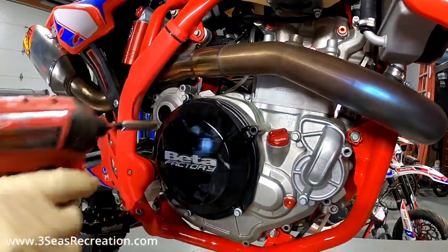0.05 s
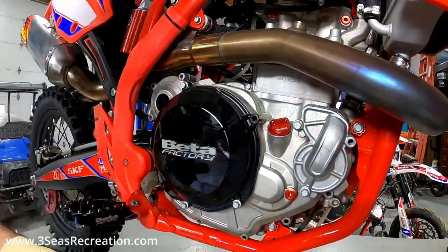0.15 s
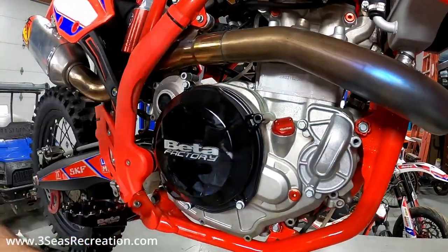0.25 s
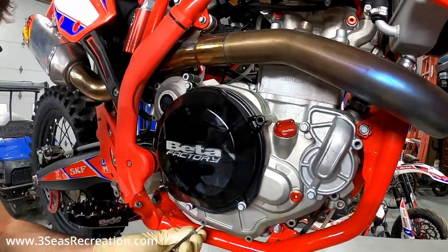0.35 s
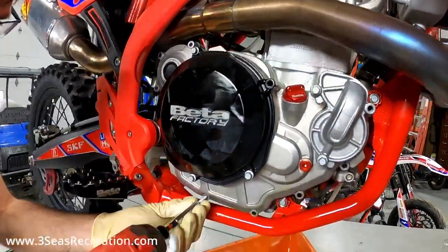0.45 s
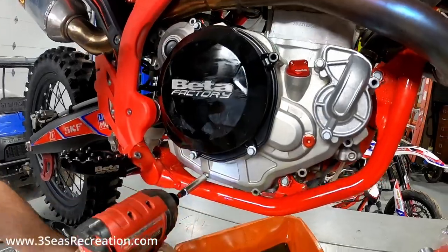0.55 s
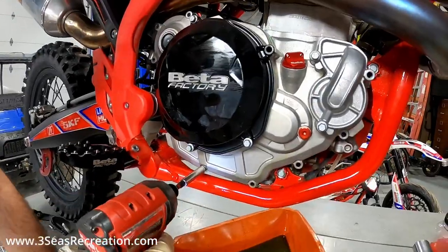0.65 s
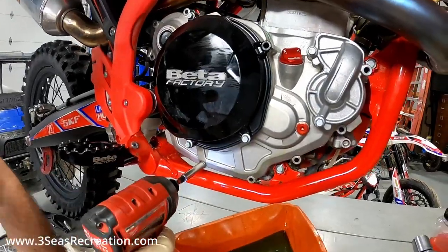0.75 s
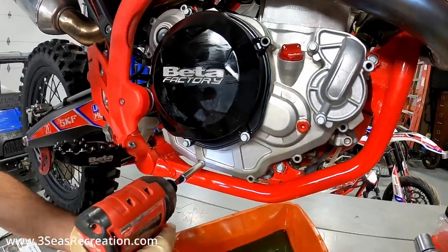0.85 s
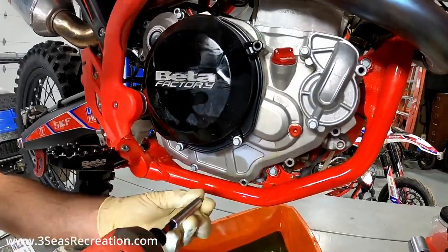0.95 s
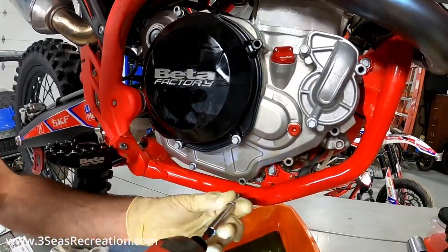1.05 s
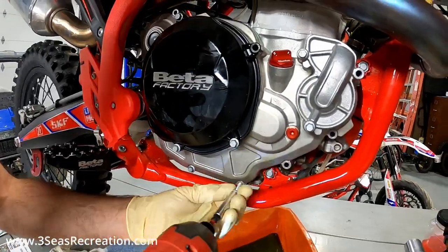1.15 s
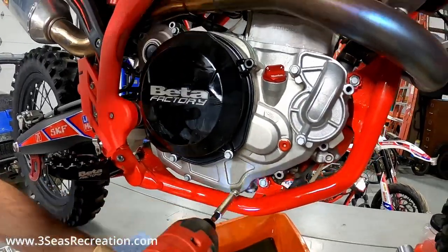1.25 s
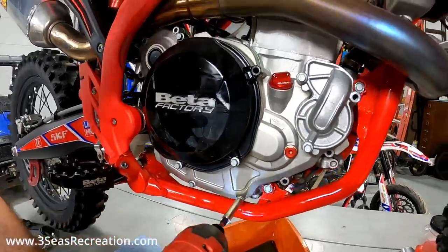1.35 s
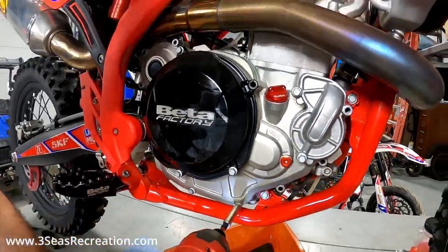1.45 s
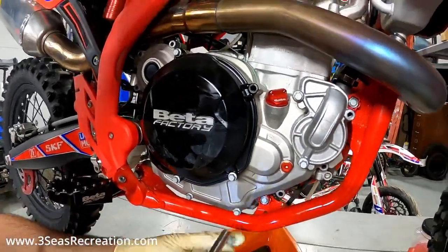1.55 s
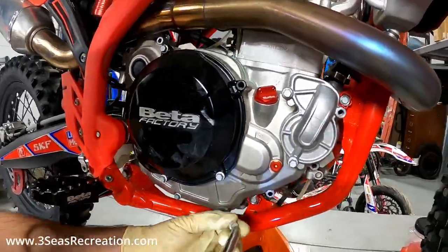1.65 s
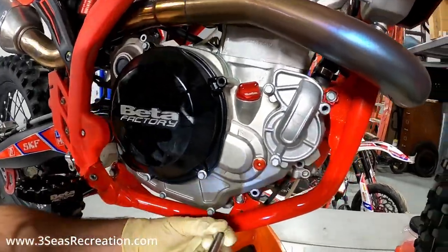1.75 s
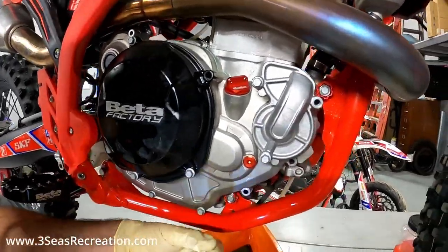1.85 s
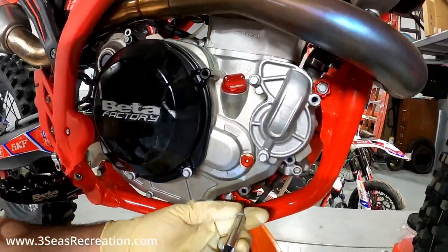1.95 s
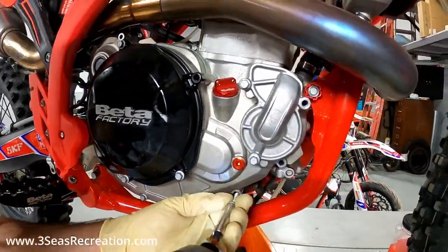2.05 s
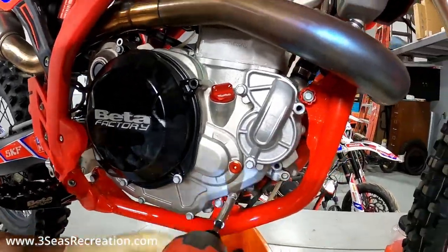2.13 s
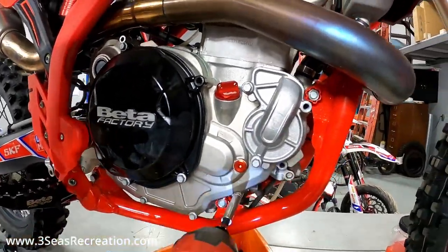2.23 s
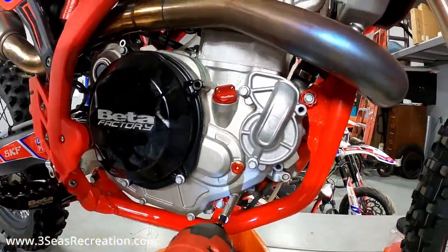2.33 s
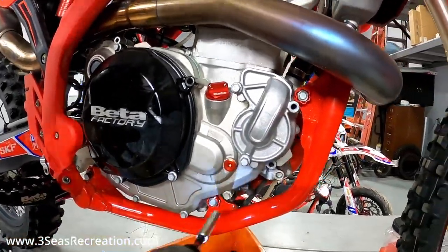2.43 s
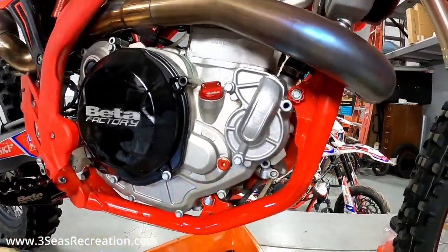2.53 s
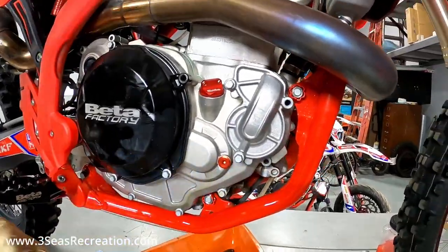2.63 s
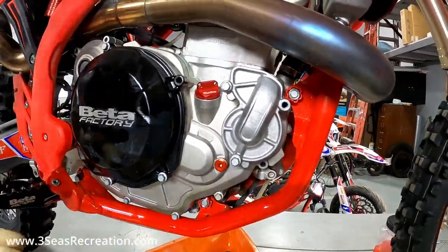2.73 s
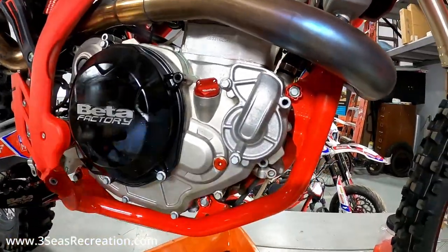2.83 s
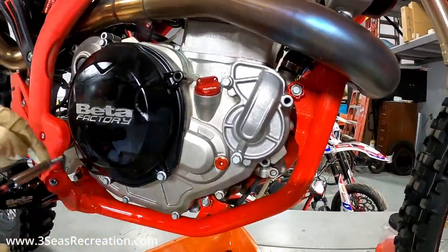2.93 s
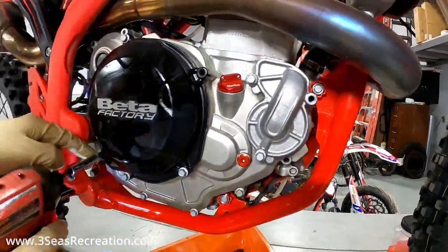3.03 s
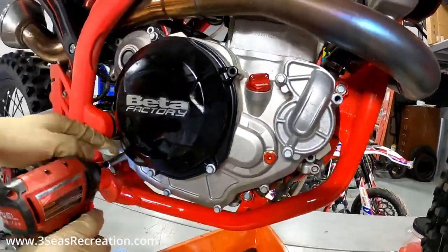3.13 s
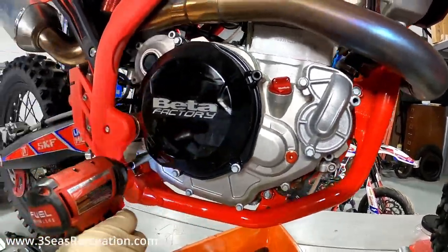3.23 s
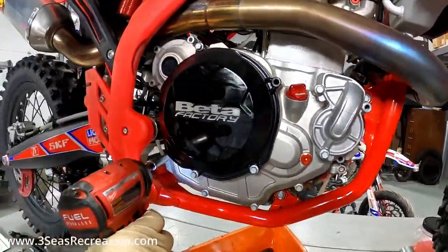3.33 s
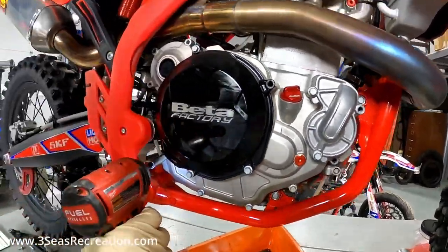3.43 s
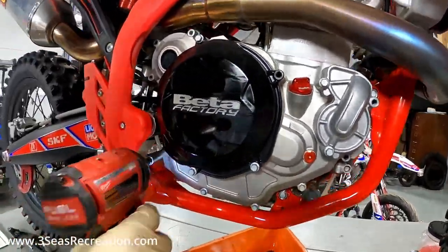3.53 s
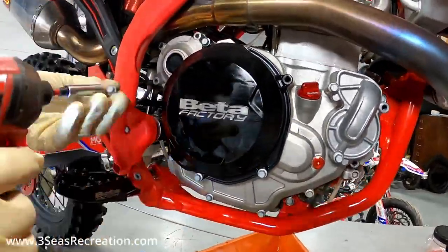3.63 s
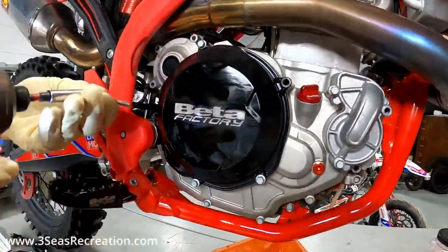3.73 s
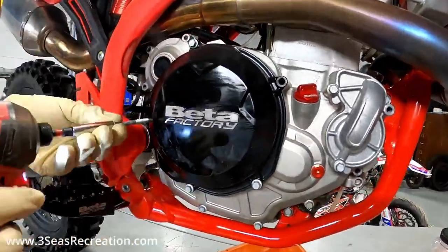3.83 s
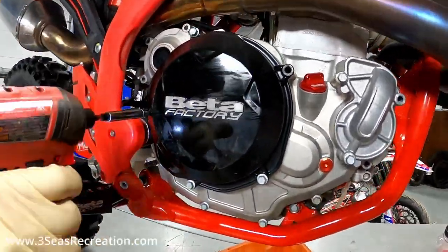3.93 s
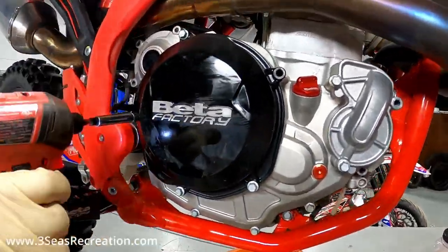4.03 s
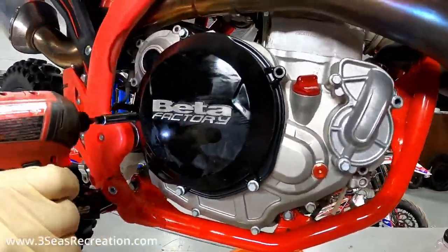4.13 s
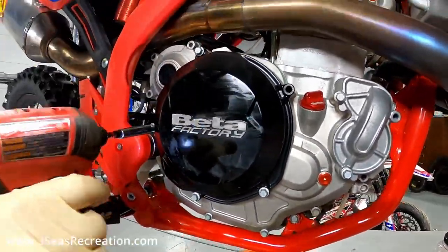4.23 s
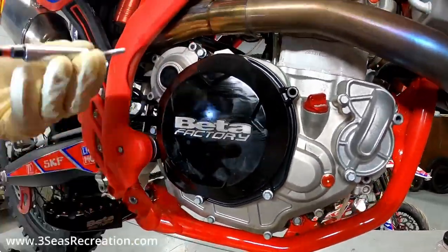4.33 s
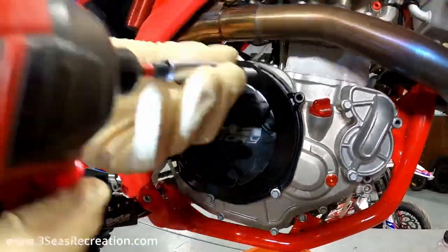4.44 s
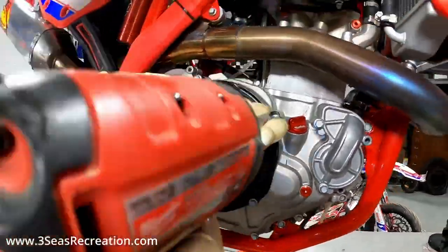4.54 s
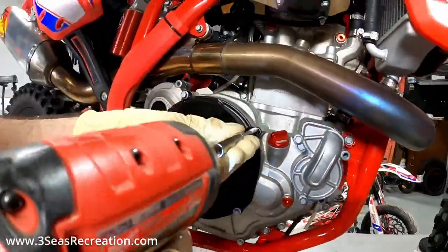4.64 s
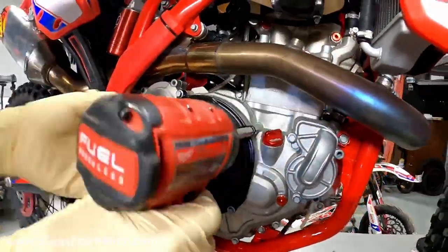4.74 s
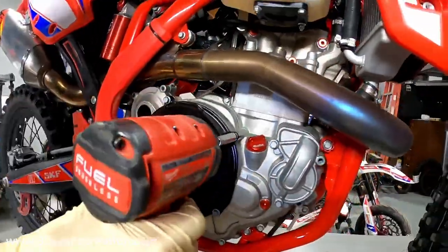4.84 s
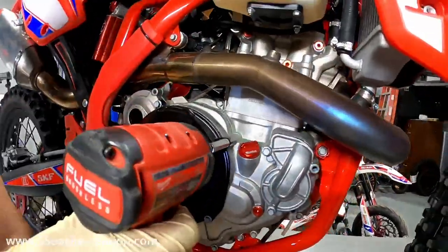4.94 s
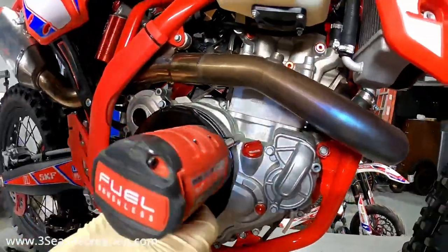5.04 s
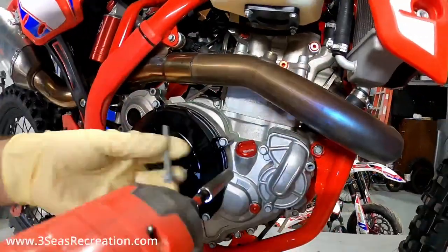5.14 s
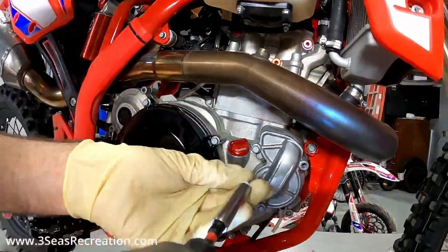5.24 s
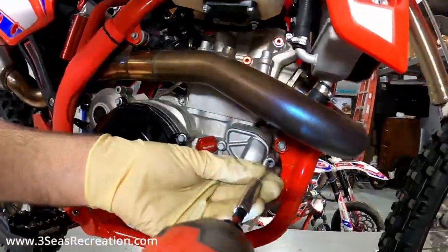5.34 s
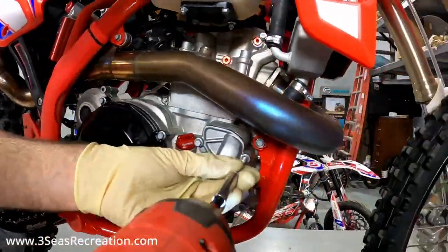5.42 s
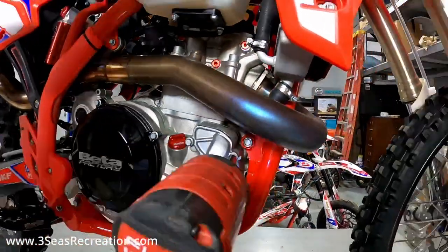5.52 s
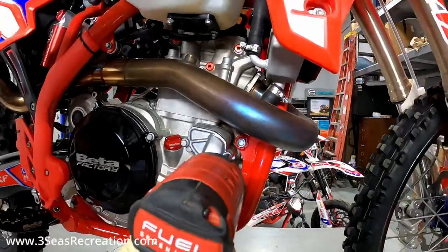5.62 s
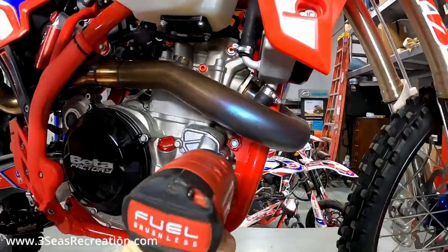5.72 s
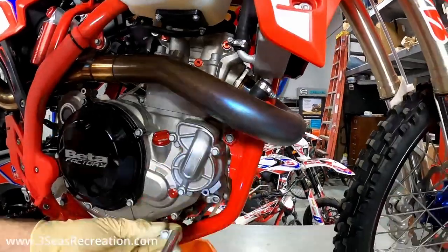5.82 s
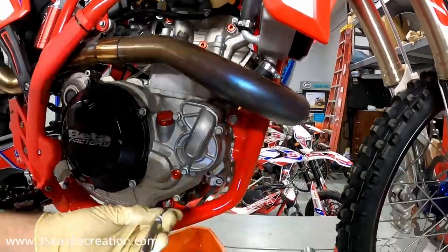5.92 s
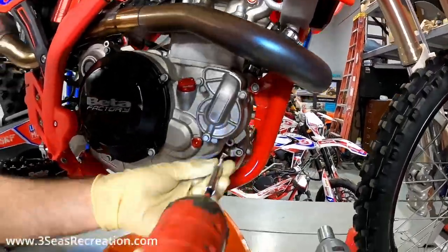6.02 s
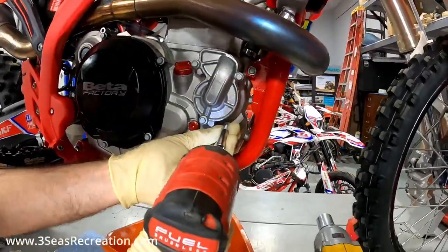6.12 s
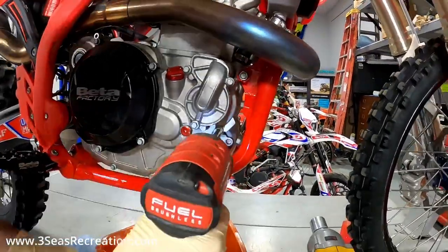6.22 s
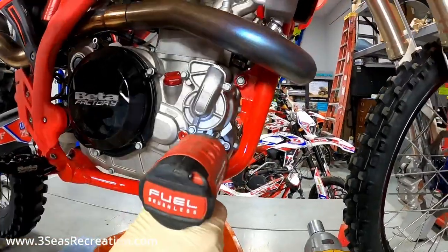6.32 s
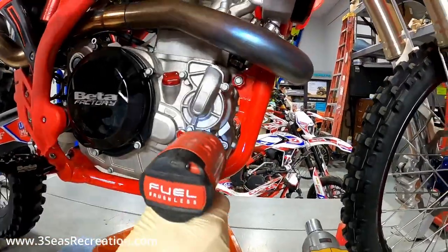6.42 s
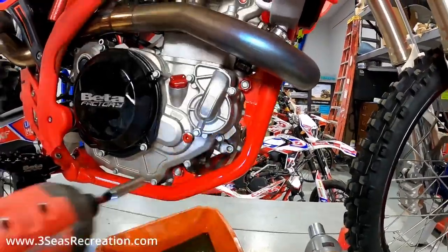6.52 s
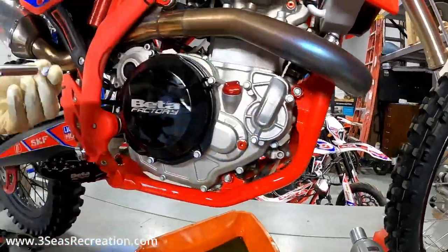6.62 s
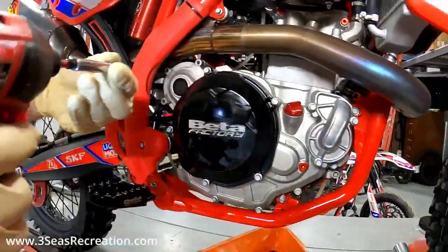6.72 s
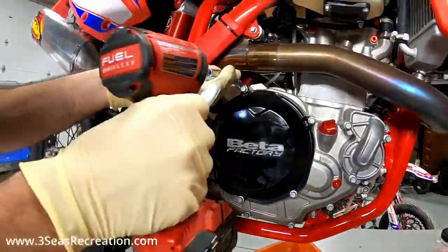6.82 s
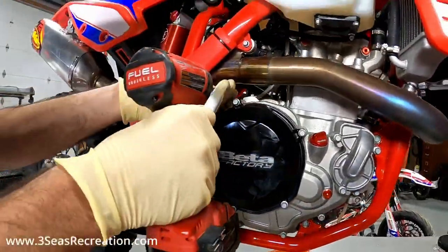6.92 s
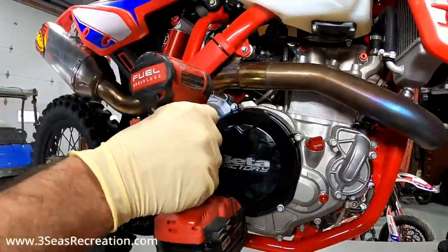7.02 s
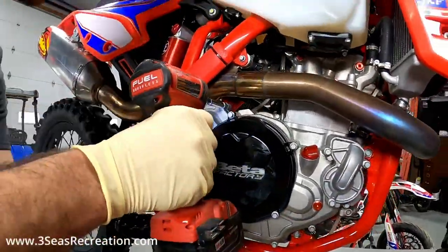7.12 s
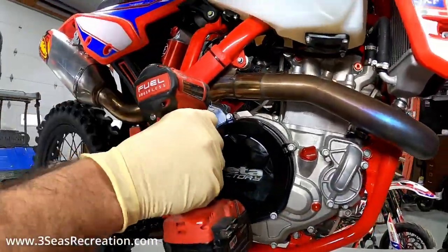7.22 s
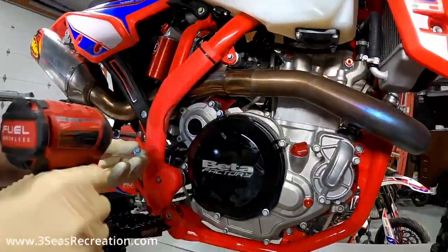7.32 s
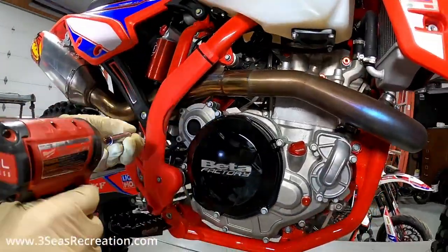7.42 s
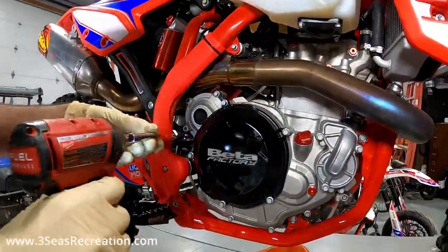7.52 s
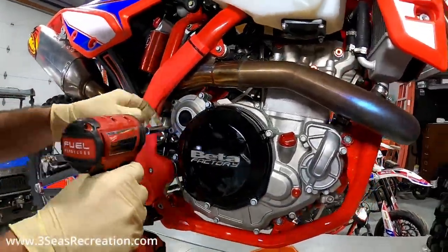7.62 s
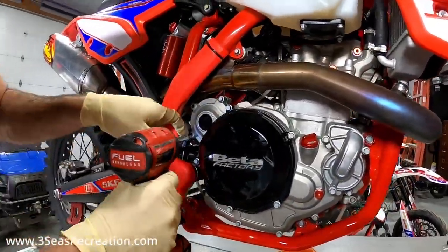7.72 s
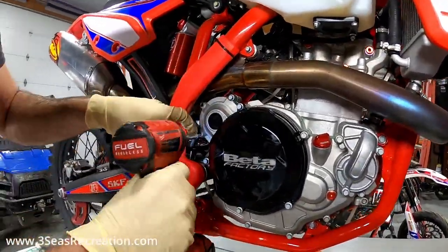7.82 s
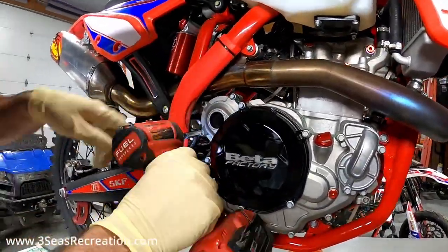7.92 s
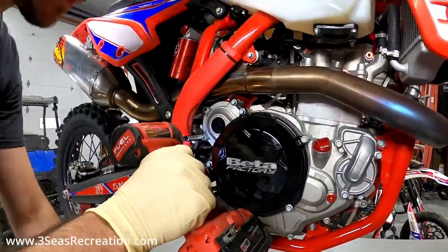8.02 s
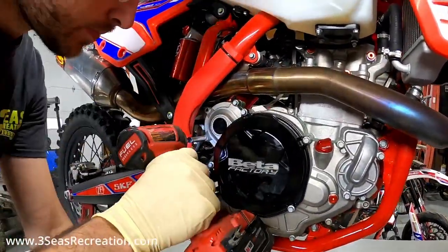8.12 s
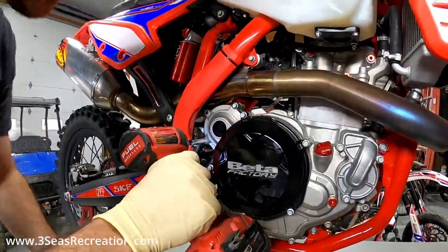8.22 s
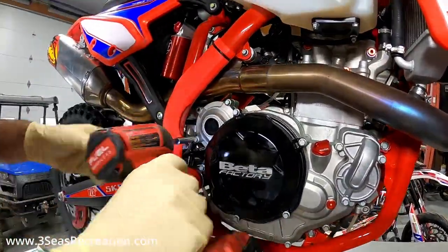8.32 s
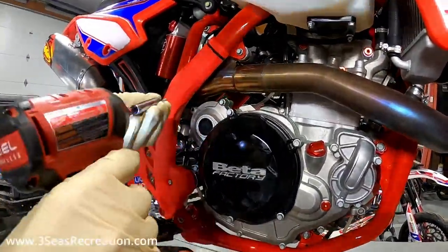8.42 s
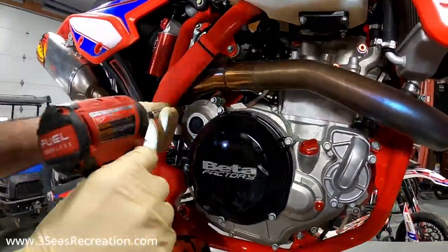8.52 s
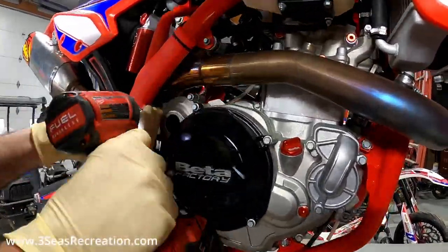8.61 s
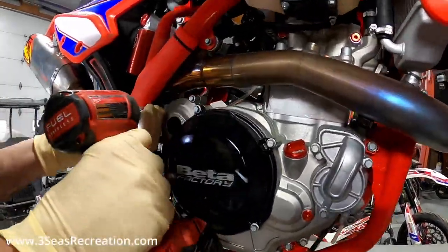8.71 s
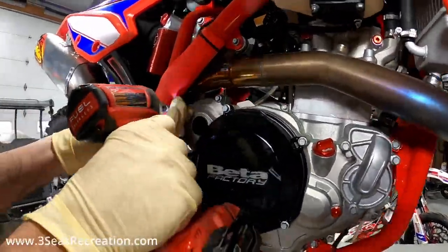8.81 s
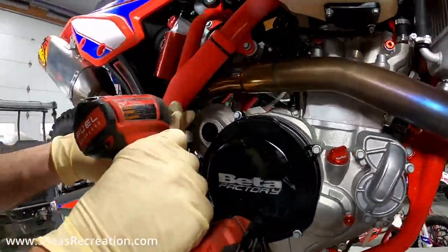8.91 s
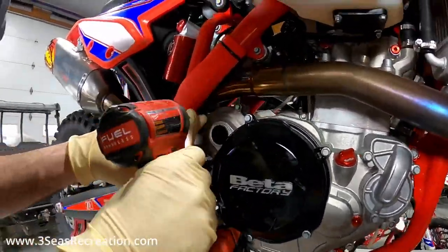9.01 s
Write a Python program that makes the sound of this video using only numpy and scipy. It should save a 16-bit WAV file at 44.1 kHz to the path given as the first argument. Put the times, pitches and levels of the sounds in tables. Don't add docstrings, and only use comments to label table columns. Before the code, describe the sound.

Close by in a small hard garage, the cut-off end of a driver growl opens, then eleven more trigger pulls follow, mostly a fifth to a third of a second, roughly every seven tenths. Pitch varies from pull to pull and sags as bolts tighten. Sharp steel clicks, dull knocks, faint loose ticks and soft glove rubbing fill the gaps, over low handling rumble and faint machinery hum.

```python
import sys
import numpy as np
from scipy import signal
from scipy.fft import rfft, irfft, next_fast_len
from scipy.io import wavfile
from scipy.ndimage import uniform_filter1d

SR = 44100
rng = np.random.default_rng(int(sys.argv[2]) if len(sys.argv) > 2 else 0)


def voltage_ratio(decibels):
    exponent = np.asarray(decibels, float) / 20
    return 10 ** exponent


def output_pcm(signal):
    pcm = np.clip(np.atleast_2d(signal).T, -1, 1) * 32767
    wavfile.write(sys.argv[1], SR, np.round(pcm).astype(np.int16))


N = 399653


def unit(x):
    return x / np.sqrt(np.mean(x ** 2) + 1e-20)


def along(points, hz):
    f, v = np.transpose(points)
    return np.interp(np.log(hz + 1), np.log(f + 1), v)


def wobble(rate):
    knots = N // 150
    return np.interp(np.arange(N) * rate / SR, np.arange(knots), rng.standard_normal(knots))


def filtered(x, response):
    m = next_fast_len(x.shape[-1] + 4096)
    return irfft(rfft(x, m) * response(np.fft.rfftfreq(m, 1 / SR)), m)[..., :x.shape[-1]]


def above(hz, edge_hz):
    return 1 / (1 + (edge_hz / (hz + 1)) ** 6)


def resonance(hz, centre_hz, width_hz):
    return 1 / (1 + ((hz - centre_hz) / width_hz) ** 2)


# start_s, stop_s, nearness_db, whine_db
PULLS = [(0, 0.042, 4.5, -53), (.598, 0.881, -0.5, -53), (1.293, 1.494, 0.5, -49.5),
         (2.197, 2.415, 0.5, -45.5), (3.256, 3.548, 1.5, -46.5), (4.003, 4.238, 0, -53.5),
         (4.853, 5.075, 2.5, -42), (5.6, 5.79, 0, -49.5), (6.295, 6.478, -0.5, -52.5),
         (7.049, 7.264, -0.5, -51.5), (8.042, 8.268, 0, -54), (8.925, 8.994, -1, -54)]
# start_s, rotor_field_hz, glide_share_per_s
TRIGGER = [(0, 205, 0), (.598, 322.8, 0.52), (.705, 311.6, 0.05), (1.292, 451.7, -1.14),
           (2.197, 452.7, -0.1), (3.256, 121.6, 0), (3.312, 303.2, 0.97), (4.003, 139.6, 12),
           (4.055, 550.8, -0.61), (4.851, 553.7, -0.5), (4.897, 372, 0), (4.947, 553.2, 0.6),
           (5.597, 682.2, 0.5), (5.668, 590.2, -0.38), (6.292, 666.3, 0), (6.39, 393.3, -0.55),
           (7.046, 274.5, 3), (7.148, 490.4, 0), (8.038, 114.2, -1), (8.096, 371.5, 0.5),
           (8.925, 113.1, -0.5)]


def trigger():
    settle_s = .016
    catch_s, catch_sag = .012, .25
    tighten_s, tighten_sag = .045, .22
    tighten_air_db, tighten_whine_db, tighten_sing_db = -4, -7.5, -4.5
    level_db, air_level_db = -32.5, -6
    gear_grows, air_grows, whine_grows, sing_grows = 5.5, 5.2, 1.6, 2.4
    rise_db_per_s, brake_db_per_s = 1802, 1501.5

    t = np.arange(N) / SR
    gear_db, whine_db = np.full(N, -120.), np.full(N, -120.)
    air_db, field_hz, sing_db = np.zeros(N), np.zeros(N), np.zeros(N)
    at, hz, glide = np.transpose(TRIGGER)
    for start, stop, near_db, aim_db in PULLS:
        on = (t > start - .05) & (t < stop + .05)
        s = np.clip(t[on], start, stop)
        k = np.searchsorted(at, np.maximum(s, start + .02)) - 1
        finger_hz = hz[k] * (1 + glide[k] * (s - at[k]))
        held = uniform_filter1d(finger_hz, size=round(settle_s * SR), mode="nearest")
        tight = np.clip(1 - (stop - s) / tighten_s, 0, 1)
        spin_up = 1 - catch_sag * np.exp((start - s) / catch_s)
        field_hz[on] = held * spin_up * (1 - tighten_sag * tight)
        octaves = np.log2(held / 400)
        slower = np.minimum(octaves, 0)
        rise_db = rise_db_per_s * np.minimum(t[on] - start, 0)
        edge_db = rise_db + brake_db_per_s * np.minimum(stop - t[on], 0)
        gear_db[on] = level_db + near_db + gear_grows * octaves + edge_db
        dull_start_db = -6 * np.exp((start - s) / 0.01)
        air_db[on] = air_level_db + air_grows * slower + tighten_air_db * tight + dull_start_db
        sing_db[on] = sing_grows * slower + tighten_sing_db * tight
        whine_db[on] = aim_db + whine_grows * octaves + tighten_whine_db * tight + edge_db
    return gear_db + 0.7 * wobble(22), air_db + 2.5 * wobble(20), field_hz, whine_db, sing_db


def orders(turns, table, flutter_db):
    total = np.zeros(N)
    for k, db in table:
        swell = voltage_ratio(db + flutter_db * np.minimum(wobble(24), 1))
        total += swell * np.sin(2 * np.pi * round(k) * turns + k * k)
    return total


# multiple, level_db
MESH = [(1, -7), (2, -9), (3, -1.5), (4, -1), (5, 2.5), (6, -0.5), (7, 3.5), (8, -2.5), (9, 0), (10, -4)]
# multiple, level_db
ROTOR = [(3, -0.5), (4, 3.5), (5, 3.5), (6, -1.5), (8, -14.5)]
# frequency_hz, level_db_per_hz
HOUSING = [(180, -48.5), (300, -10.5), (397, -13.5), (835, -5), (968, -0.5), (2170, -4.5), (2930, 2),
           (4420, -4), (5570, -17.5), (7750, -19), (10300, -50), (11100, -82), (12300, -41.5), (14000, -47),
           (15500, -66)]
# centre_hz, width_hz, gain_db
CASE = [(2140, 80, 4), (2720, 110, 4), (3170, 100, 4), (4290, 70, 2.5), (4520, 60, 4)]


def gearbox(turns, field_hz, sing_db):
    mesh_turns = 1.59 * turns + .019 * wobble(120)
    mesh = voltage_ratio(-8) * unit(orders(mesh_turns, MESH, flutter_db=2.5))
    rotor_db = -13.5 + 5 * np.log2(field_hz / 400 + .01)
    rotor = voltage_ratio(rotor_db) * unit(orders(turns, ROTOR, flutter_db=4.5))
    chatter_db = 2.4 * np.minimum(wobble(260), 1.6) + .4 * wobble(45)
    hiss = unit(rng.standard_normal(N) * voltage_ratio(chatter_db))

    def housing(hz):
        case_db = sum(db * resonance(hz, centre, width) for centre, width, db in CASE)
        return voltage_ratio(np.maximum(along(HOUSING, hz), -52) + case_db)

    return filtered(hiss + voltage_ratio(sing_db - 0.5) * (mesh + rotor), housing)


# multiple_of_field_rate, level_db
WHINE = [(-3, -19), (-2, -16.5), (-1, -2.5), (0, -12.5), (1, -9.5)]


def inverter(turns):
    switch_hz = 9985
    carrier = switch_hz * np.arange(N) / SR
    whine = np.zeros(N)
    for k, db in WHINE:
        whine += voltage_ratio(db + 1.8 * wobble(25)) * np.sin(2 * np.pi * (carrier + round(k) * turns))
    return whine


def driver():
    gear_db, air_db, field_hz, whine_db, sing_db = trigger()
    turns = np.cumsum(field_hz) / SR
    body = gearbox(turns, field_hz, sing_db)
    gears = unit(filtered(body, lambda hz: 1 - above(hz, 6500)))
    air = unit(filtered(body, lambda hz: above(hz, 6300) * (hz < 14700)))
    tool = voltage_ratio(gear_db) * (voltage_ratio(-0.93) * gears + voltage_ratio(air_db) * air)
    return tool + voltage_ratio(whine_db + 6.5) * inverter(turns)


def coloured(colour):
    return unit(filtered(rng.standard_normal((2, N)), lambda hz: voltage_ratio(along(colour, hz))))


# frequency_hz, level_db_per_hz
HUM = [(59, -55.5), (100, -19.5), (173, 0.5), (251, -11.5), (290, -2.5), (334, -16.5), (391, -20.5),
       (600, -33), (780, -63.5), (1320, -120)]


def machinery():
    return voltage_ratio(-66) * voltage_ratio(2 * wobble(14)) * coloured(HUM)


# frequency_hz, level_db_per_hz
RUMBLE = [(15, -13), (30, -0.5), (60, 1.5), (105, 0.5), (150, 1), (300, -64)]
# peak_s, rumble_db
JOLTS = [(0, -61.5), (0.542, -54), (1.1, -62), (1.45, -58), (2.17, -49), (2.85, -54.5), (3.2, -49),
         (3.5, -50), (3.8, -57.5), (4.15, -59.5), (4.798, -44.5), (5.1, -52.5), (5.52, -48.5), (5.8, -56),
         (6.25, -52.5), (6.8, -66.5), (7.2, -59), (7.75, -61), (8.2, -49), (9.06, -51)]


def leaning():
    lean_db_per_s, let_go_db_per_s = 57.5, 45.5
    t = np.arange(N) / SR
    leans = [db + np.minimum(lean_db_per_s * (t - s), let_go_db_per_s * (s - t)) for s, db in JOLTS]
    rumble_db = np.max(leans, axis=0) - 4.5 + 5.5 * wobble(15)
    return voltage_ratio(rumble_db + np.array([[1.3], [-1.3]])) * coloured(RUMBLE)


# frequency_hz, level_db_per_hz
RUSTLE = [(240, -26.5), (400, -7), (576, -9), (816, -6.5), (894, -4), (1430, 2.5), (1720, -5.5),
          (2360, -6.5), (5350, -12), (6420, -11), (15000, -45.5)]
# time_s, level_db
RUSTLING = [(.12, -74), (.262, -58.5), (.45, -81.5), (1.08, -70), (1.56, -66), (1.9, -75.5), (2.1, -68),
            (2.55, -65.5), (3.15, -68.5), (4.5, -66), (5.13, -71), (5.46, -74.5), (5.97, -71), (6.8, -74),
            (7.4, -76.5), (7.88, -71.5), (8.6, -72), (8.79, -61.5)]


def rustling():
    s, db = np.transpose(RUSTLING)
    rustle_db = np.interp(np.arange(N) / SR, s, db)
    cloth = coloured(RUSTLE)
    crisp = filtered(cloth, lambda hz: above(hz, 2700))
    patchy = voltage_ratio(2.5 * wobble(16)) * (cloth - crisp) + voltage_ratio(3.5 * wobble(20)) * crisp
    return voltage_ratio(rustle_db - 3.5 + 1.2 * wobble(60)) * patchy


# frequency_hz, t60_s
WALLS = [(200, 0.084), (2000, 0.11), (10000, 0.03)]


def walls(x):
    hz, t, z = signal.stft(rng.standard_normal((2, SR // 3)), SR, nperseg=256)
    decay = voltage_ratio(-60 * t / along(WALLS, hz)[:, None])
    tail = signal.istft(z * decay, SR, nperseg=256)[1]
    delayed = np.pad(x, (300, 0))[None]
    return signal.fftconvolve(delayed, tail / np.linalg.norm(tail[0]), axes=1)[:, :N]


# frequency_hz, level_db_per_hz
METAL = [(180, -8), (300, -8.5), (937, -3.5), (1070, -5), (1220, -2.5), (2610, -7), (2980, -8),
         (8140, -23.5), (12100, -41.5), (15500, -48)]


def contact(t, ring_hz, bright_db, half_ms, thump_db):
    half = max(half_ms, 1) / 1000
    late = t - 0.85 * half
    shape = np.exp(-np.abs(late / half) ** 1.4)
    noise = filtered(rng.standard_normal(len(t)), lambda f: voltage_ratio(along(METAL, f)))
    high = filtered(noise, lambda f: above(f, 4000))
    near = filtered(noise, lambda f: resonance(f, ring_hz, 0.16 * ring_hz))
    rattle = voltage_ratio(-7) * unit(noise - high) + voltage_ratio(-11) * unit(near) + voltage_ratio(bright_db + 2.5) * unit(high)
    ring_level = (half_ms < 11) * voltage_ratio(-14.5 - .45 * max(bright_db, -26))
    ring = ring_level * np.sin(2 * np.pi * (ring_hz * late + rng.uniform()))
    thump_shape = np.exp(-np.where(late < 0, -late / .008, late / .015))
    thump = np.sin(2 * np.pi * rng.uniform(85, 125) * late) * thump_shape
    return shape * (rattle + ring) + voltage_ratio(thump_db - 2.0) * thump


# start_s, peak_db, ring_hz, bright_db
SCRAPES = [(.078, -30.5, 3950, -10.5), (0.408, -37.5, 2340, -26), (.455, -37.5, 1570, -21),
           (0.965, -33, 1700, -8), (1.923, -37, 1930, -8), (3.936, -19, 605, -18.5),
           (4.217, -16, 2490, -14), (4.733, -28, 2700, -31.5), (5.498, -16, 1309, -21),
           (8.317, -11.5, 3370, -13), (8.823, -24.5, 3650, -11.5), (8.966, -23, 2825, -17.5)]
# start_s, peak_db
TICKS = [(.195, -51.5), (.285, -46), (1.055, -42), (1.114, -46.5), (1.69, -43.5), (1.73, -45.5),
         (1.713, -47.5), (2.633, -47), (2.69, -42), (2.736, -35.5), (2.87, -43.5), (2.913, -49),
         (2.974, -38), (3.084, -44.5), (4.281, -45.5), (4.386, -47), (5.186, -47.5), (5.267, -48),
         (5.356, -52), (5.928, -47), (5.97, -46), (6.017, -50.5), (7.328, -47), (7.435, -54), (7.58, -54),
         (8.293, -40), (8.488, -56), (8.592, -54.5), (8.783, -42)]
# start_s, peak_db
RUBS = [(.24, -50.5), (1.995, -48.5), (2.525, -41), (2.715, -44.5), (2.86, -44), (2.9, -50), (3.69, -50.5),
        (4.5, -57.5), (4.685, -49), (5.23, -53.5), (5.9, -50.5), (6.53, -47), (6.605, -55), (6.65, -57.5),
        (6.735, -54.5), (6.785, -55.5), (7.3, -47), (7.56, -55.5), (7.87, -54), (8.36, -43), (8.67, -53)]
# start_s, peak_db, ring_hz, bright_db
CRACKS = [
    (.479, -14.5, 3400, -10.5),
    (5.535, -9, 1200, -25),
    (8.808, -21.5, 2300, -14),
    (6.239, -12, 1100, -14.5),
]
# start_s, peak_db, ring_hz, bright_db
BUMPS = [(.526, -19.5, 1133, -16.5), (.539, -22, 1748, -8), (2.145, -24.5, 1189, -29),
         (3.164, -37, 1552, -17), (3.191, -14.5, 2270, -12.5), (3.961, -16, 944, -15.5),
         (4.754, -13.5, 2760, -21), (5.518, -14, 960, -17), (6.221, -18, 1265, -18),
         (7.005, -19, 2288, -18), (7.279, -28.5, 947, -16), (7.951, -22, 1355, -17.5),
         (8.855, -27.5, 1390, -23)]
# start_s, peak_db, ring_hz, bright_db
SHOVES = [
    (.829, -22, 2750, -5.5),
    (1.221, -31, 1213, -19),
    (1.51, -31.5, 3310, -19),
    (2.47, -22.5, 2420, -11),
    (7.909, -33.5, 1310, -24.5),
    (9.024, -16, 2660, -8.5),
]
# start_s, peak_db
CREASES = [(.919, -40), (1, -40.5), (1.171, -45), (1.962, -44), (2.092, -44.5), (3.583, -35.5),
           (3.727, -33.5), (3.917, -29.5), (4.429, -40), (4.458, -43), (4.523, -42.5), (4.606, -52),
           (5.11, -46), (5.425, -43), (5.818, -45), (5.991, -44), (6.065, -53), (6.184, -48),
           (6.509, -38.5), (6.986, -33), (7.75, -50.5), (7.452, -52), (8.553, -47.5), (8.746, -47)]
# start_s, peak_db, ring_hz, bright_db
CLICKS = [(1.249, -19.5, 1157, -20), (2.165, -18.5, 1294, -20.5), (2.41, -14, 3480, -20),
          (2.499, -23, 1780, -8), (3.252, -20.5, 2466, -16.5), (3.741, -31, 4860, 1),
          (3.764, -32, 4900, -18.5), (3.791, -31.5, 3770, -2), (3.857, -25, 2210, -24.5),
          (3.983, -11.5, 1154, -19), (4.234, -15, 4030, -9), (4.773, -11.5, 2634, -13.5),
          (4.8, -19.5, 1329, -10), (5.293, -28.5, 2150, -7.5), (5.471, -26.5, 1072, -32),
          (6.461, -14.5, 1366, -9.5), (6.837, -38.5, 1490, -19), (7.783, -39.5, 2450, -21),
          (8.622, -31, 3360, -5), (2.127, -33, 1230, -17), (3.902, -26.5, 1800, -27),
          (5.331, -31, 1130, -26.5), (7.933, -31.5, 1320, -15)]


def knocks():
    out = np.zeros(N + 4096)
    t = (np.arange(4096) - 1024) / SR
    kinds = [(SCRAPES, (8.3, -34)), (TICKS, (1901, -6, 5, -40)), (RUBS, (2500, -14, 12, -40)),
             (CRACKS, (2.6, -13)), (BUMPS, (6.6, -12)), (SHOVES, (11, -5)),
             (CREASES, (1198.5, -19.5, 4, -44)), (CLICKS, (3.8, -35))]
    for rows, kind in kinds:
        for row in rows:
            s, db, *character = (*row, *kind)
            start = round(s * SR) - 1024
            out[start:start + len(t)] += voltage_ratio(db - 7.5) * contact(t, *character)
    return out[:N]


def scene():
    tool = driver() + knocks()
    shop = machinery() + leaning() + rustling()
    return voltage_ratio(2.0) * tool * voltage_ratio([[1.1], [-1.1]]) + voltage_ratio(-14.0) * walls(tool) + voltage_ratio(7.5) * shop


def band_limit(x):
    return signal.sosfilt(signal.butter(12, 15710, fs=SR, output="sos"), x)


def record(dry):
    z = signal.stft(dry, nperseg=1024, noverlap=768)[2]
    drift = rng.standard_normal(z.shape)
    for _ in range(2):
        drift = uniform_filter1d(uniform_filter1d(drift, size=13, axis=1), size=18, axis=2)
    phase_rad = 2.5 * unit(drift)
    scrambled = signal.istft(z * np.exp(1j * phase_rad), nperseg=1024, noverlap=768)[1][:, :N]
    return band_limit(scrambled)


dry = scene()
out = record(dry)
output_pcm(out)
```